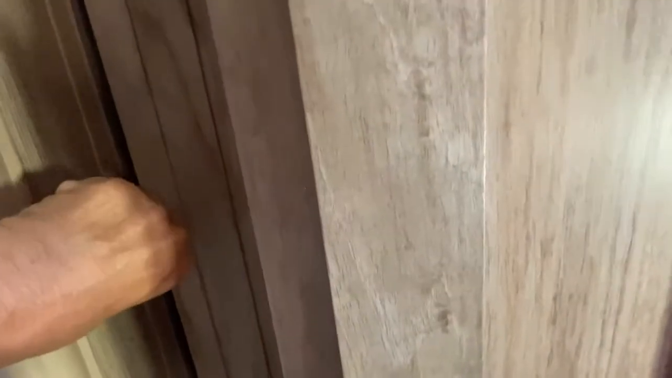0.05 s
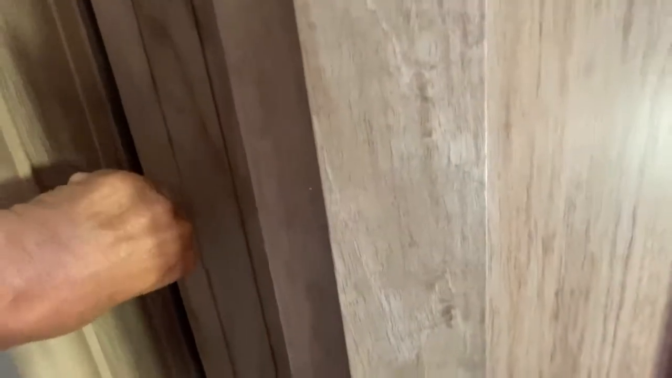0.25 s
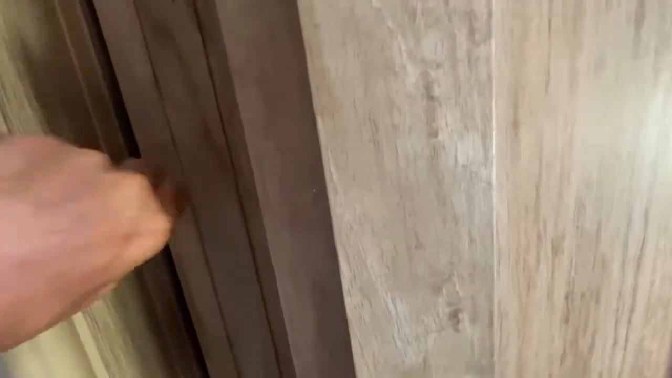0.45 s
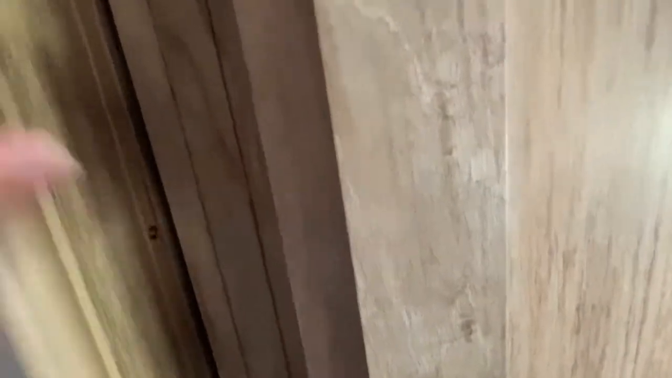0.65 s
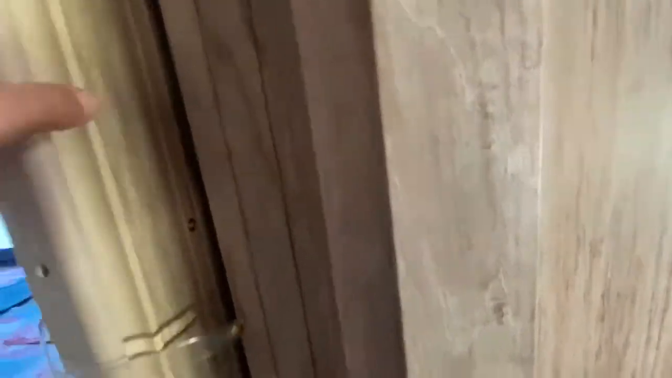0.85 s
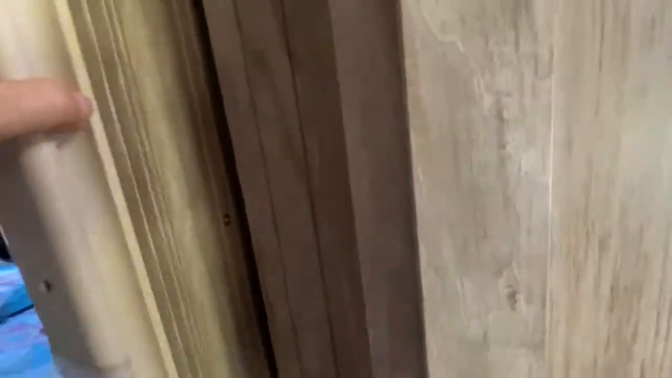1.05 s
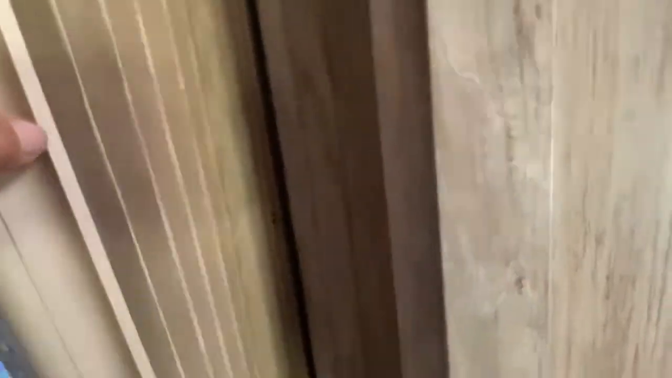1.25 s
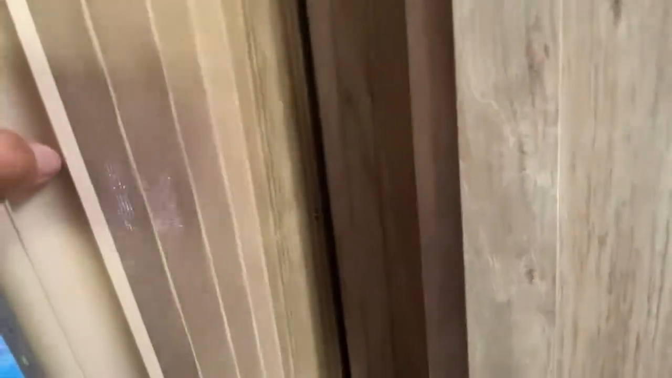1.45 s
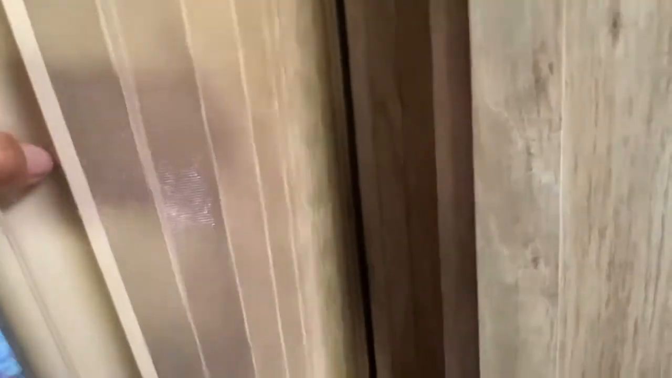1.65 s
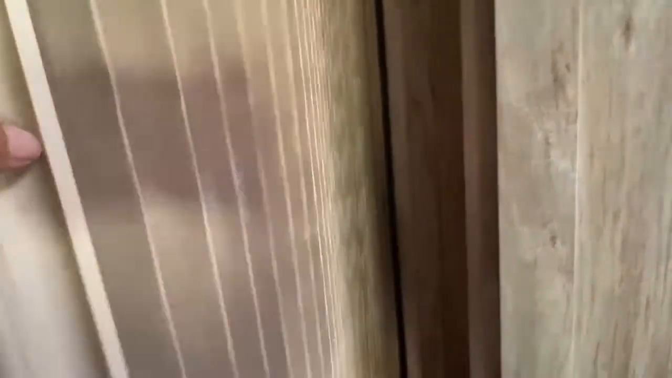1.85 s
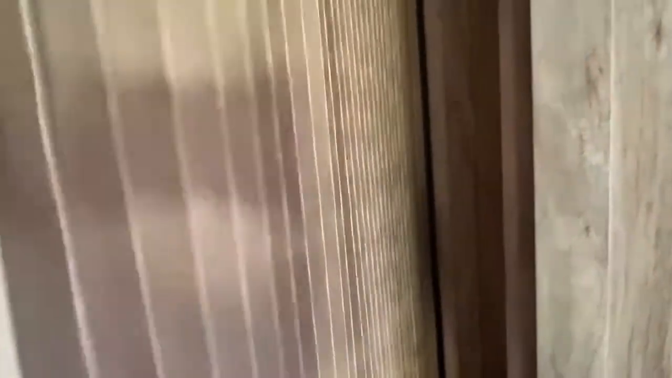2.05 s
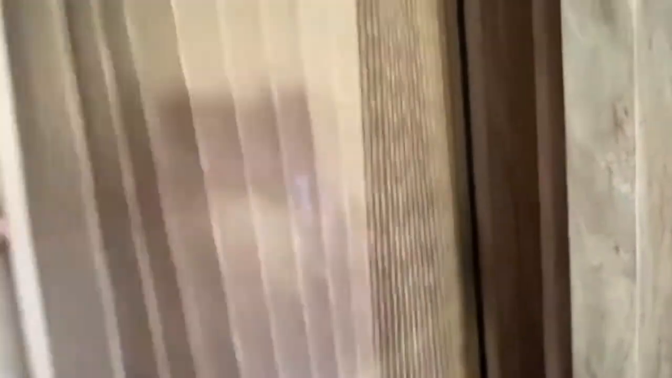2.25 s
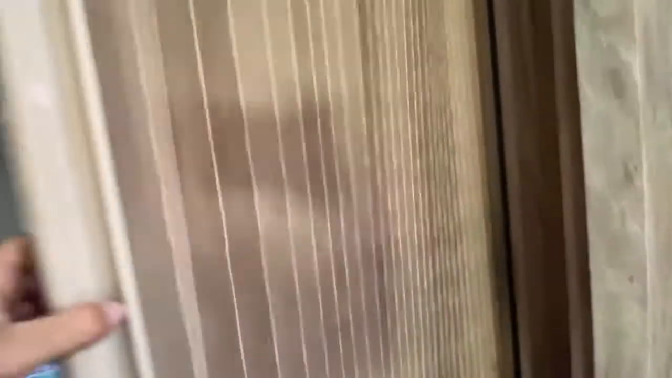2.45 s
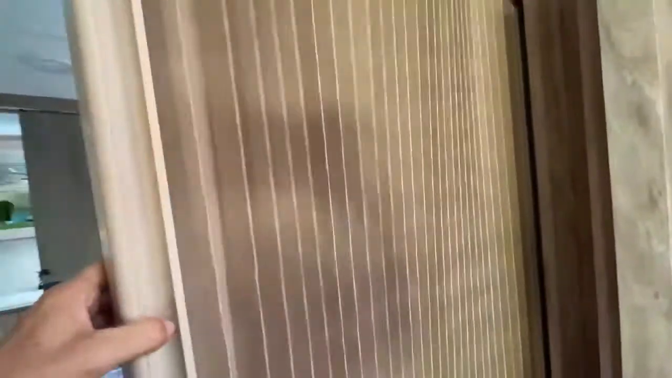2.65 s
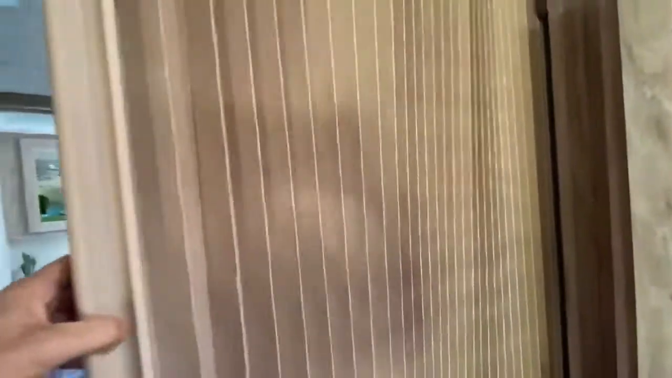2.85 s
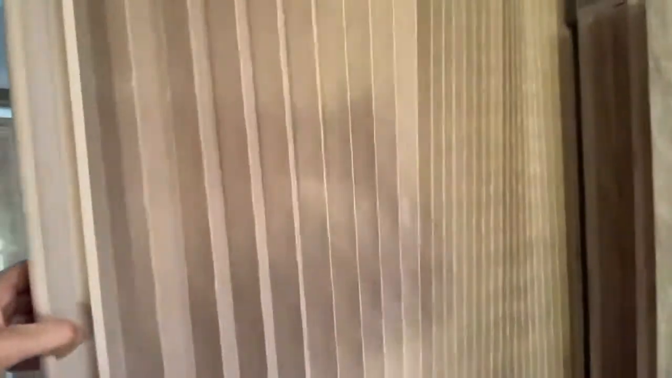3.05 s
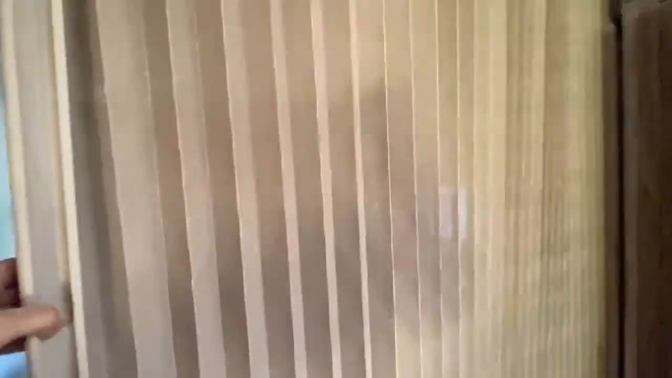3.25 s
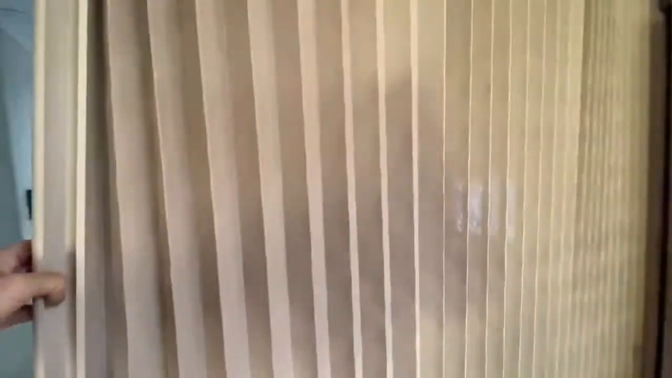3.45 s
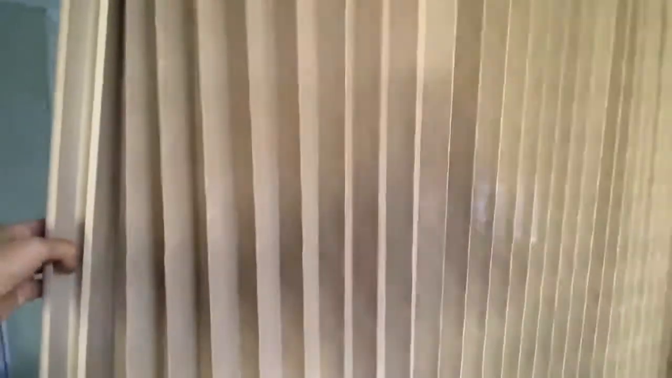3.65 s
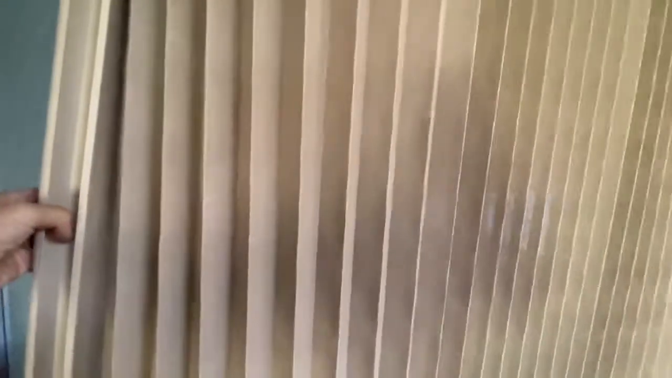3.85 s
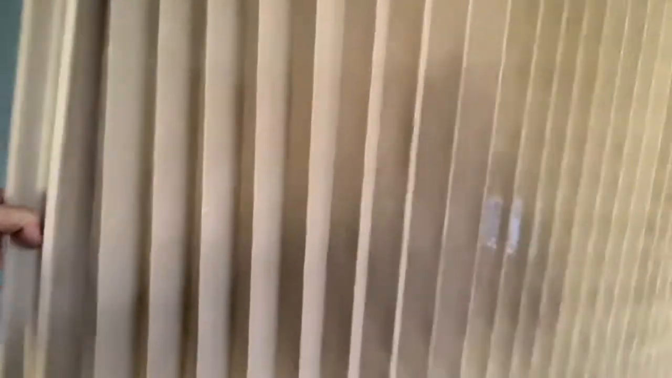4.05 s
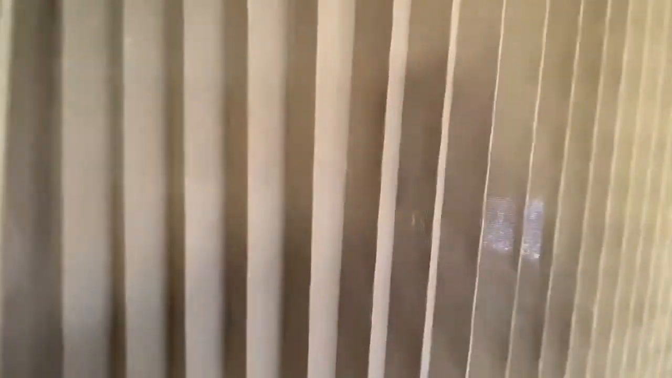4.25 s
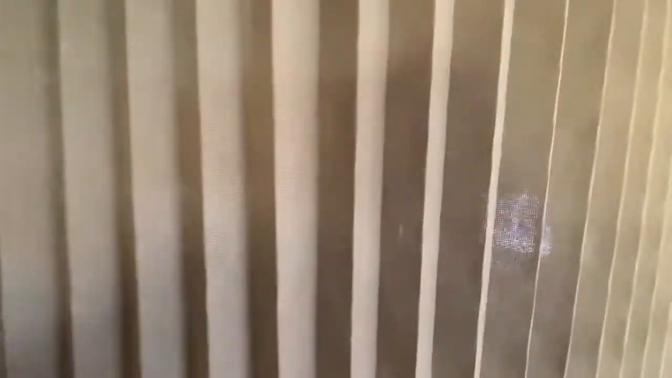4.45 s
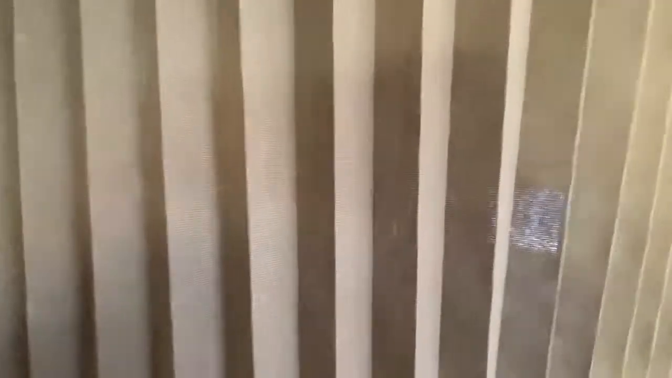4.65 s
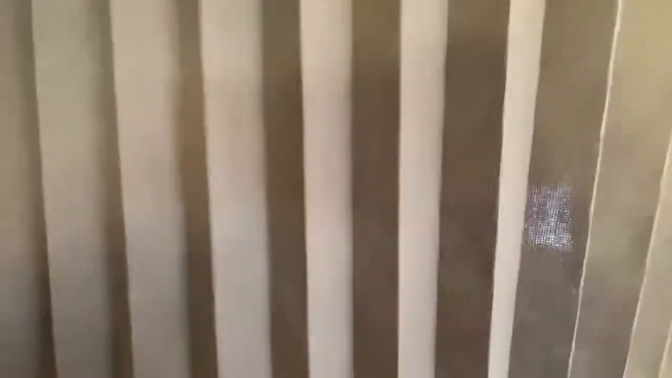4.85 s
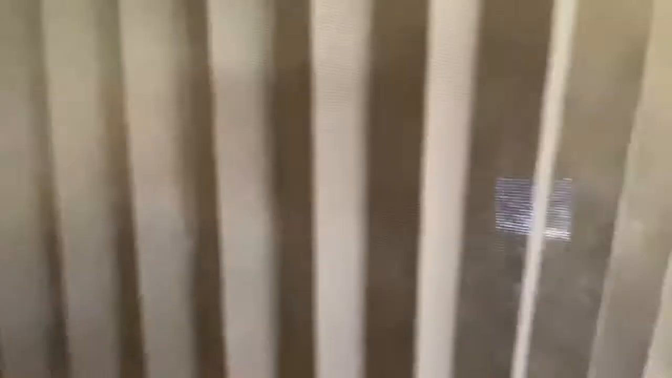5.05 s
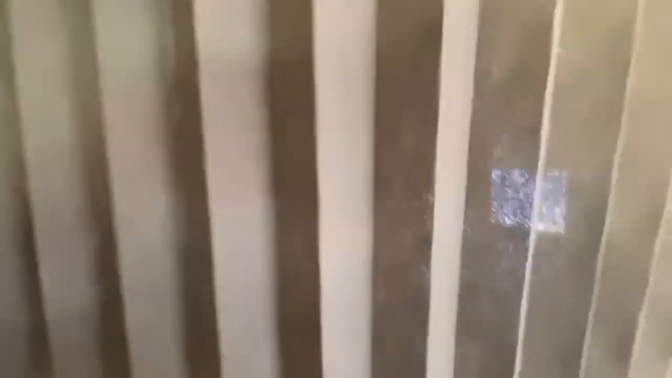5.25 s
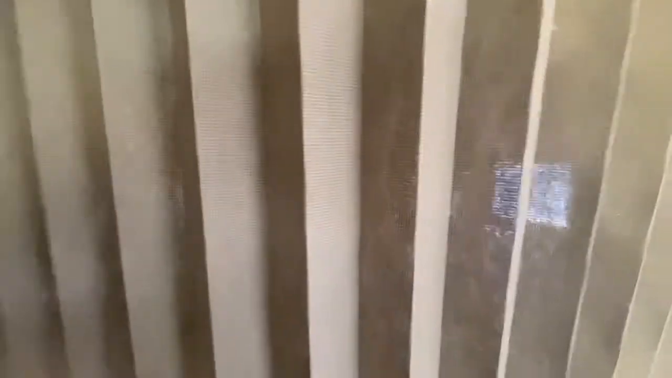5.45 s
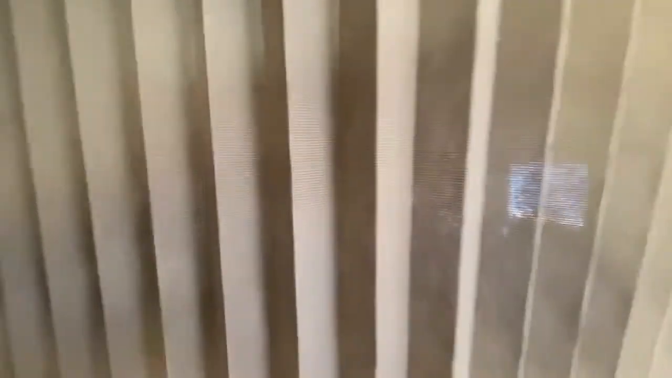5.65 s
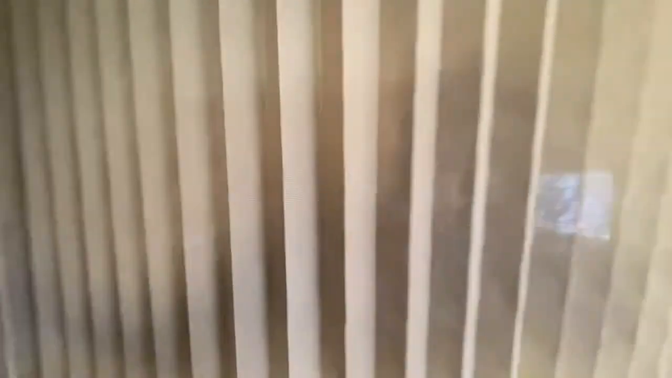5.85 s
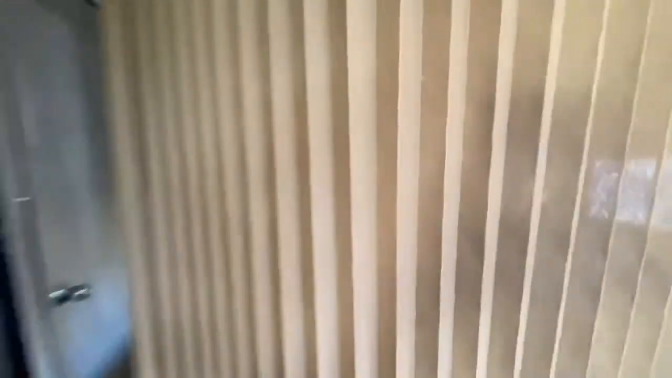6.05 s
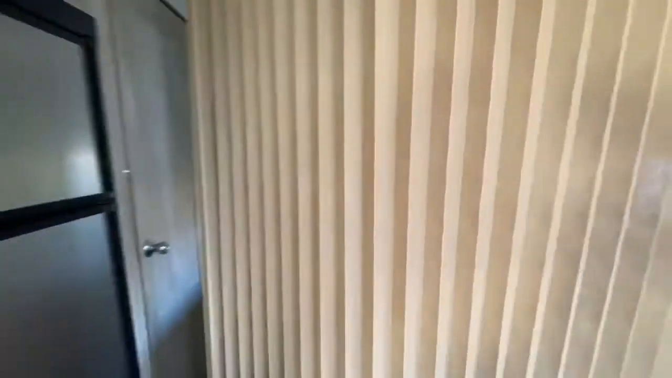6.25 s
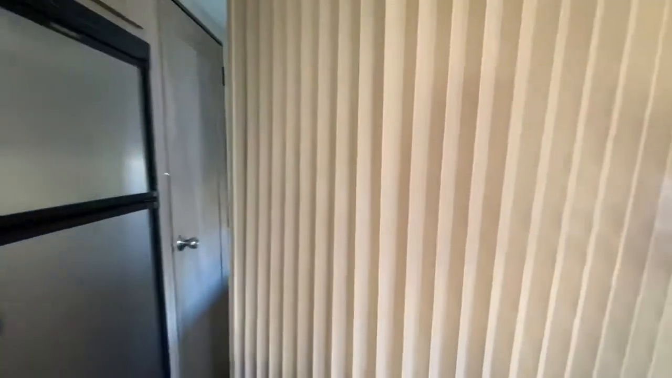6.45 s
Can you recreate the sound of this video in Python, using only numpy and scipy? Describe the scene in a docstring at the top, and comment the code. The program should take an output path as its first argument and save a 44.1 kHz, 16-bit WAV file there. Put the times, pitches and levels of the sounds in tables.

```python
"""A pleated folding door in a small camper: enveloped noise bands, decaying modes and friction grains. The
catch lets go with a jolt and a knock, and fingers tick off the handle. As the door is drawn, gliders scrape,
squeak and catch on the track. Pleats snap open one after another and rustle while the hanging panel sways and
bumps; the snaps ring on in the cabin. The last folds rub taut, and a faint breath follows."""
import sys
import numpy as np
from scipy import signal
from scipy.fft import rfft, irfft, next_fast_len
from scipy.io import wavfile
from scipy.ndimage import uniform_filter1d, map_coordinates

SR = 44100
rng = np.random.default_rng(int(sys.argv[2]) if len(sys.argv) > 2 else 0)


def master(y):
    """Save y as 16-bit WAV."""
    cut = np.clip(np.atleast_2d(y).T, -1, 1)
    pcm = np.round(cut * 32767)  # scale
    wavfile.write(sys.argv[1], SR, pcm.astype(np.int16))


N = 287091
TIME = np.arange(N) / SR
AGE = np.arange(2 * SR // 5) / SR  # time since a blow [s]
TOP_HZ = 15750  # upper band limit of the receiver

# Levels in the tables are relative: each source adds its own offsets.
# Quiet air of the cabin: (frequency [Hz], density [dB per Hz])
AIR_SPECTRUM = [(15, -30.5), (25, -5), (76, 8), (123, -6), (270, -13), (531, -16), (695, -16.5),
                (1160, -33), (1440, -28.5), (16000, -44.5)]
AIR_DB = -66.5
# How hard the door is moved: (time [s], effort [dB])
PULL_EFFORT = [(0.3, -76), (0.38, -83.5), (1.08, -64), (1.51, -53), (1.74, -49), (1.82, -62), (1.92, -51),
               (2.21, -56.5), (2.43, -63.5), (2.75, -62), (3.09, -58), (3.2, -60.5), (3.66, -56),
               (3.83, -59.5), (4.08, -74.5), (4.31, -65.5), (4.44, -60.5), (5.75, -58), (5.92, -62),
               (6.02, -76)]
STEADY_PULL_DB = -58
HALF_OPEN_S, SLACK_S = 3.33, 0.61  # when the panel hangs loosest, and for how long either side
# Panel set swinging by the latch or a tug: (time [s], length [s], level [dB])
SWINGS = [(0.45, 0.05, -49), (2.2, 0.54, -51.5), (3.193, 0.077, -38), (4.749, 0.37, -46)]
# Swaying panel, flexing folds, crinkling skin: (frequency [Hz], density [dB per Hz])
SWAY_SPECTRUM = [(20, -30), (48, 3.5), (96, -4), (115, -2), (172, -16.5), (237, -12), (270, -9.5),
                 (319, -13), (414, -13.5), (436, -29), (550, -23.5), (720, -23.5), (1210, -120)]
FLEX_SPECTRUM = [(260, 1), (450, -3.5), (661, -5.5), (810, 3.5), (1100, -1.5), (1300, 3.5), (2160, -15),
                 (2400, -5.5), (3120, -32), (5280, -120)]
RUSTLE_SPECTRUM = [(1180, -17.5), (2000, -2.5), (2510, -4.5), (4860, -6), (5440, -13), (6590, -9.5),
                   (7770, -21.5), (11500, -15), (12700, -29), (16000, -27.5)]
# Modes of the half-open hollow panel: (frequency [Hz], level [dB], 60 dB decay time [s])
HOLLOW_MODES = [(95.9, 0, 0.23), (168.7, -4.5, 0.35), (263.1, -4, 0.3), (328.6, 2.5, 0.11)]
# Modes of the whole panel swinging after a bump: (frequency [Hz], level [dB], 60 dB decay time [s])
THUMP_MODES = [(63, -12, 0.22), (89.4, 0, 0.2), (120.8, -4, 0.22)]
# Gliders dragging on the track: (time [s], length [s], level [dB], rasp over that level [dB])
DRAGS = [(1.324, 0.054, -47.5, -5.5), (1.389, 0.032, -45, -23), (1.473, 0.12, -51, -7.5),
         (1.591, 0.014, -40.5, -13), (1.64, 0.051, -44, -23), (4.241, 0.3, -69, -2)]
# Friction of the gliders on the track: (frequency [Hz], density [dB per Hz])
TRACK_SPECTRUM = [(320, -59), (550, -25.5), (851, -30), (1020, -0.5), (1130, -11.5), (1780, -15),
                  (1970, -32), (2240, -21.5), (2630, -26.5), (3300, -39), (5420, -48), (15400, -120)]
# Resonances of the track channel: (frequency [Hz], width [Hz], level [dB])
CHANNEL_PEAKS = [(867, 25, 1.5), (977, 31, 1), (1063, 24, -2.5), (1220, 14, 0.5), (1312, 16, -1),
                 (1414, 50, -8.5), (2500, 130, -28), (3240, 420, -14.5)]
# Main scrape resonance, shifting as the gliders tilt in the track: (time [s], frequency [Hz])
SCRAPE_PITCH = [(1.33, 1200), (1.385, 1560), (1.42, 1000), (1.53, 1350), (1.605, 1050), (1.635, 1320),
                (1.68, 1080), (4.25, 1220)]
# Last folds rubbing as they pull taut: (time [s], length [s], level [dB])
STRETCH = (5.639, 0.29, -53.5)
# Folds rubbing, skin brushing: (frequency [Hz], density [dB per Hz])
FOLD_SPECTRUM = [(200, 4.5), (380, 10.5), (550, 2), (850, 10), (1700, -15), (2600, -1.5), (4800, 2.5),
                 (6200, -13), (9000, -30), (16000, -51)]
SKIN_SPECTRUM = [(2000, 0.5), (5000, -5.5), (8000, -13.5), (11000, -2.5), (13500, -17.5), (16000, -16.5)]
# Fingers and palm sliding round the post: (time [s], length [s], level [dB])
HAND_RUBS = [(0.43, 0.12, -68), (0.758, 0.11, -60), (1.053, 0.099, -62), (4.007, 0.087, -59)]
# A faint breath as the door comes to rest: (time [s], length [s], level [dB])
FAINT_BREATH = (6.04, 0.19, -53.5)
# The faint breath: (frequency [Hz], density [dB per Hz])
BREATH_SPECTRUM = [(88, -55.5), (200, -20), (341, 0.5), (702, -10.5), (821, -3.5), (1240, -20),
                   (2100, -24.5), (3620, -28), (6640, -30), (16000, -59)]
# Gliders squeaking on the rail: (time [s], level [dB], length [s])
SQUEAKS = [(1.723, -43.5, 0.038), (1.9655, -29.5, 0.0097), (1.983, -41.5, 0.029), (1.988, -43, 0.016),
           (3.646, -48.5, 0.043)]
RAIL_HZ, RAIL_WIDTH_HZ = 4440, 920  # the resonance that a squeak rings
# One glider jumping free: (time [s], peak level [dB], frequency [Hz], half length [s])
GLIDER_PING = (1.9678, -14, 4400, .0006)
# Tiny dry ticks as the fingers leave the handle: (time [s], level [dB])
FINGER_TICKS = [(0.5786, -50), (0.5921, -44), (0.599, -42.5), (0.6114, -46.5), (0.6774, -49), (0.7233, -58)]
# Dry, glassy cracks at the peaks of the hardest snaps: (time [s], level [dB])
CRACKS = [(0.2078, -34.5), (2.0758, -38), (2.5295, -31), (3.0565, -29.5), (3.0638, -34.5), (3.0795, -38.5),
          (3.325, -35), (3.663, -41.5), (4.9208, -36.5), (5.316, -35.5)]
# Ticks and cracks: (frequency [Hz], density [dB per Hz])
CRACK_SPECTRUM = [(2000, -11.5), (5000, -8.5), (11500, 1.5), (13500, -23.5), (15000, -6), (16300, -14)]
# The catch and its plate: (frequency [Hz], density [dB per Hz])
CATCH_SPECTRUM = [(76, -29), (130, -14), (230, 8.5), (345, -6.5), (510, -2.5), (640, -1.5), (872, 1.5),
                  (1010, -16.5), (1770, -15), (2120, -29.5), (3120, -53), (5280, -67)]
# Modes of the door jamb: (frequency [Hz], level [dB], 60 dB decay time [s])
JAMB_MODES = [(100.5, -1.5, 0.39), (422, -1, 0.13), (740, 2, 0.09), (1325, -13.5, 0.22), (2060, -15, 0.2)]
# Leading post and panel bumping: (time [s], level [dB], weight [dB], pitch of the struck spot [Hz],
# its ring over the level [dB]); heavy bumps thump, light ones clack
KNOCKS = [(0.209, -28.5, 6.5, 750, -3), (0.332, -50.5, 4, 515, 0), (0.421, -41, 2.5, 275, 3),
          (0.764, -45, -25, 344, 7.5), (0.849, -43.5, -7, 341, 6), (0.977, -44.5, -4, 426, -0.5),
          (1.238, -39.5, -2, 447, -5), (1.286, -37.5, 6, 116, 6.5), (1.415, -42.5, -28, 1006, 11.5),
          (1.487, -44.5, 5.5, 221, 7.5), (1.636, -40, 12, 124, 11.5), (1.673, -33.5, 4, 849, -8),
          (1.783, -48.5, 2.5, 315, 8), (2.157, -43, 5.5, 825, -2.5), (2.441, -38.5, 4.5, 305, -5),
          (2.522, -28.5, 1.5, 331, -8), (2.732, -42.5, -24.5, 465, 0.5), (3.034, -44, -8.5, 266, 14),
          (3.055, -29, -5, 269.5, 7.5), (3.074, -24, 1, 115, 4), (3.186, -37, 6, 311, 7.5),
          (3.219, -29, -0.5, 340.6, 9.5), (3.466, -36, 2.5, 348, -2.5), (3.577, -40.5, 6, 290, 5.5),
          (3.66, -44, 12.5, 227, 10.5), (4.025, -37.5, 7, 90, 4.5), (4.341, -45.5, -15, 352, 3),
          (4.397, -54, 13, 116, 11.5), (4.521, -43, -12, 1260, 2), (4.857, -42.5, 0, 284, 6.5),
          (5.295, -38.5, 9, 826, -0.5), (5.315, -32.5, 0, 245, 3), (5.813, -49.5, 7.5, 339, 6),
          (6.465, -66.5, -18, 797, 8.5)]
# The struck post: (frequency [Hz], density [dB per Hz])
POST_SPECTRUM = [(96, 1), (139, 1), (190, 3), (246, 3), (286, -1.5), (338, -3), (451, -6), (494, -14.5),
                 (648, -32), (732, -25), (904, -30), (975, -35), (1300, -38.5), (1690, -52), (2860, -120)]
# Pleats snapping open: (time [s], level [dB], brightness [dB], the pleat's own pitch [Hz])
PLEAT_SNAPS = [(0.2066, -32.5, 5, 1770), (0.2419, -38, -3.5, 1310), (0.421, -47.5, -13, 1230),
               (0.472, -52.5, -8, 2360), (0.7622, -45, -1, 1060), (0.848, -44, -1.5, 2290),
               (1.1267, -37.5, -4, 975), (1.191, -48, -1, 1620), (1.293, -34, -3, 1298),
               (1.3581, -31, 2.5, 1400), (1.729, -33.5, -3, 4320), (1.864, -39, 3.5, 1230),
               (2.0689, -28.5, 2.5, 4670), (2.073, -37.5, 10.5, 3900), (2.2, -39, 2, 1480),
               (2.22, -41.5, -2.5, 1500), (2.263, -43, -0.5, 4500), (2.316, -36, 4.5, 2310),
               (2.3397, -33, 6.5, 4550), (2.384, -39, 7.5, 5230), (2.426, -42, 0, 4790),
               (2.4484, -33.5, -1.5, 3920), (2.517, -32.5, -0.5, 1190), (2.528, -31.5, 0, 1070),
               (2.632, -38.5, 1, 4360), (2.7337, -30.5, 2.5, 2420), (2.846, -41.5, -3, 2550),
               (2.991, -46, 3.5, 2750), (3.012, -34, 4, 6780), (3.054, -29, 0.5, 890),
               (3.062, -26, 1, 1420), (3.0755, -28, 1, 765), (3.1981, -27.5, 0, 5000),
               (3.258, -38.5, 6, 1146), (3.3234, -33, 7, 5200), (3.413, -39, 3, 4830),
               (3.456, -34.5, 0, 4800), (3.5847, -30.5, -1, 4560), (3.6124, -35, 1, 3100),
               (3.6603, -27.5, 7, 4970), (3.757, -41, 4, 2930), (3.777, -44, 1.5, 5030),
               (3.829, -48, 5, 4700), (4.338, -46, 0.5, 1290), (4.368, -50, 6, 1290),
               (4.4842, -37.5, -3, 1210), (4.5192, -37.5, -3, 2690), (4.687, -47.5, 6, 4800),
               (4.807, -36, 3, 4470), (4.886, -36.5, -3, 2600), (4.92, -28.5, 5.5, 5120),
               (5.173, -46.5, 7.5, 1380), (5.243, -44, 6.5, 2570), (5.2841, -36.5, 1, 2800),
               (5.291, -32.5, -0.5, 3450), (5.3133, -33, -0.5, 3750), (5.459, -35.5, 7.5, 2500),
               (5.639, -40, 3.5, 2920), (5.869, -44, -3, 2460)]
# A snapping pleat: (frequency [Hz], density [dB per Hz])
PLEAT_SPECTRUM = [(410, -22), (750, -12.5), (1210, -3), (2000, -10.5), (2490, -6.5), (3940, -6),
                  (4920, -1.5), (5400, -10.5), (6570, -8), (7790, -24.5), (11100, -17.5), (13300, -34.5),
                  (16000, -28)]
# Two microphone ports: (frequency [Hz], likeness [0-1], phase of left [rad], left over right [dB])
PORT_FIELD = [(96.3, 0.96, 0.48, -2.5), (306, 0.99, 0.79, -7.5), (455, 0.86, 0.5, -7.5),
              (606, 0.42, 2.53, -1.5), (1210, 0.43, 1.9, 1), (1560, 0, 3.97, -3), (2364, 0.5, 6.3, -3.5),
              (3130, 0, 5.97, 0), (4460, 0.1, 5.13, 1.5), (7600, 0.2, 6.1, 5), (10700, 0.3, 17, -3),
              (12260, 0.5, 7.7, 2.5), (14350, 0.6, 4, -0.5)]
# Narrow peaks and dips given to every sound: (frequency [Hz], width [Hz], level [dB])
COLOUR_PEAKS = [(289, 23, -0.5), (670, 36, -2), (742, 34, 3.5), (5800, 170, 5), (6050, 420, -8),
                (7100, 500, 0), (7680, 220, -2.5)]


def amp(db):
    """Amplitude ratio of a level in dB."""
    return 10 ** (np.asarray(db) / 20)


def unit(x):
    """Normalisation to an rms of 1."""
    return x / np.sqrt(np.mean(x ** 2) + 1e-20)


def fade(t60):
    """Exponential damping: a fall of 60 dB in t60 seconds."""
    return np.exp(-np.log(1000) * AGE / t60)


def rise(seconds):
    """Finite contact time: a blow starts softly."""
    return 1 - np.exp(-AGE / max(seconds, 1 / SR))


def along(points, hz):
    """Interpolation of (frequency, value) points on a logarithmic axis."""
    f, v = np.transpose(points)
    return np.interp(np.log(hz + 1), np.log(f + 1), v)


def filtered(x, response):
    """Linear filtering: the spectrum of x times a response of frequency."""
    size = x.shape[-1]
    padded = next_fast_len(size + SR // 20, True)
    hz = np.fft.rfftfreq(padded, 1 / SR)
    return irfft(rfft(x, padded) * response(hz), padded)[..., :size]


def coloured(x, spectrum, ripple_db=2, spacing_hz=110):
    """Modal density: a given spectrum rippled by many close resonances, at rms 1."""
    knots = rng.standard_normal(2048)

    def response(hz):
        ripple = np.interp(hz / spacing_hz, np.arange(len(knots)), knots)
        depth_db = ripple_db * np.minimum(hz / 1000, 1)  # less ripple below 1 kHz
        return amp(along(spectrum, hz) + depth_db * ripple)
    return unit(filtered(x, response))


def band(x, lo, hi):
    """Band-pass filtering with sloping edges, at rms 1."""
    def response(hz):
        low_edge = 1 + (lo / (hz + 1)) ** 14
        high_edge = 1 + (hz / hi) ** 14
        return 1 / np.sqrt(low_edge * high_edge)
    return unit(filtered(x, response))


def bandpass(hz, centre, width):
    """Complex response of one damped resonator, 1 at its centre."""
    return 1j * hz * width / (centre * centre - hz * hz + 1j * hz * width)


def resonant(x, peaks):
    """Resonators in parallel excited by x, at rms 1."""
    return unit(filtered(x, lambda hz: sum(amp(db) * bandpass(hz, c, w) for c, w, db in peaks)))


def ringing(modes, size=1):
    """Modal decay, each mode at its own phase; a larger part rings lower."""
    out = 0
    for hz, db, t60 in modes:
        cycles = hz / size * AGE + rng.random((2, 1))
        out = out + amp(db) * fade(t60) * np.sin(2 * np.pi * cycles)
    return out


def noise(size=N):
    """Two uncorrelated white noises: one for the shared field, one for the diffuse field."""
    return rng.standard_normal((2, size))


def wobble(rate):
    """Slow random modulation: a smooth curve with rate knots a second."""
    return map_coordinates(rng.standard_normal(int(TIME[-1] * rate) + 4), [TIME * rate])


def steady(x):
    """Levelling the slow beats of close modes, so that a blow starts at its full strength."""
    return x / np.sqrt(np.abs(uniform_filter1d(x ** 2, size=SR // 40)) + 1e-9)


def grains(spectrum, rate, spread_db, t60, smooth):
    """Stick-slip friction: random uneven slips, each ringing briefly, over smooth rubbing."""
    sizes = amp(spread_db * np.minimum(rng.exponential(size=N), 4))
    slips = (rng.random(N) < rate / SR) * sizes  # rate is slips a second
    power = np.abs(signal.fftconvolve(slips ** 2, fade(t60) ** 2)[:N])
    return coloured(noise() * np.sqrt(power / power.mean() + smooth), spectrum)


def stroke(s, length, db, attack, release):
    """Envelope of one rub: it swells, holds and dies away."""
    swell = 1 - np.exp(-np.maximum(TIME - s, 0) / attack)
    return amp(db) * swell * np.exp(-np.maximum(TIME - s - length, 0) / release)


def shifting(pitch, width_hz):
    """Narrow-band noise on a moving carrier: a rubbed resonance follows a pitch curve, at rms 1."""
    phase = 2 * np.pi * np.cumsum(np.interp(TIME, *np.transpose(pitch))) / SR
    pair = [wobble(width_hz) * np.cos(phase) + wobble(width_hz) * np.sin(phase) for _ in range(2)]
    return unit(np.array(pair))


def effort(s):
    """Driving force at time s, in dB over a steady pull."""
    return np.interp(s, *np.transpose(PULL_EFFORT)) - STEADY_PULL_DB


def slack(s):
    """Freedom of the panel, 0-1: it swings and rings most freely when half open."""
    return 1 / np.hypot(1, (s - HALF_OPEN_S) / SLACK_S)


def add(out, s, sound):
    """Superposition: mix a sound in at time s."""
    start = int(np.clip(round(s * SR), 0, N - 1))
    out[:, start:start + sound.shape[-1]] += sound[..., :N - start]


def cabin():
    """Stationary background noise: the quiet air of the cabin."""
    return amp(AIR_DB) * coloured(noise(), AIR_SPECTRUM)


def panel(sway_db=-57, slack_db=10, drum_db=-6, flex_db=-61, rustle_db=-64,
          sway_grows=0.59, flex_grows=0.92, rustle_grows=0.73, stop_s=0.28, settle_s=0.083):
    """Forced vibration: the pull sways and drums the panel, flexes folds, crinkles skin; tugs swing it."""
    pull = effort(TIME)  # each part grows by its own share of these dB
    start, end = PULL_EFFORT[0][0], PULL_EFFORT[-1][0]
    moving = stroke(start, end - start, 0, attack=0.015, release=stop_s)
    swings = sum(stroke(*row, attack=0.0095, release=settle_s) for row in SWINGS)
    pulled = moving * amp(sway_db + sway_grows * pull + slack_db * slack(TIME) ** 2)
    sway = grains(SWAY_SPECTRUM, rate=49, spread_db=1.5, t60=0.19, smooth=0.51)
    drum = unit(signal.fftconvolve(noise(), ringing(HOLLOW_MODES), axes=1)[:, :N])
    low = np.hypot(pulled, swings) * (sway + amp(drum_db) * slack(TIME) * drum)
    flexing = grains(FLEX_SPECTRUM, rate=95, spread_db=1.0, t60=0.08, smooth=0.1)
    folds = amp(flex_db + flex_grows * pull) * flexing
    rustling = grains(RUSTLE_SPECTRUM, rate=150, spread_db=3.0, t60=0.19, smooth=0.093)
    skin = amp(rustle_db + rustle_grows * pull) * rustling
    return low + moving * (folds + skin)


def hand_on_post(hand_db=-1):
    """Skin friction: fingers and palm brush round the post in many fine slips."""
    rubs = sum(stroke(*row, attack=0.015, release=0.032) for row in HAND_RUBS)
    return amp(hand_db) * rubs * grains(SKIN_SPECTRUM, rate=2500, spread_db=4.5, t60=0.0068, smooth=0.41)


def folds_stretching():
    """Friction between surfaces: the last folds rub as they pull taut."""
    fibres = grains(FOLD_SPECTRUM, rate=600, spread_db=3, t60=0.025, smooth=0.2)
    return stroke(*STRETCH, attack=0.0037, release=0.046) * fibres


def faint_breath():
    """Evenly coloured noise: a faint soft breath follows as the door comes to rest."""
    return stroke(*FAINT_BREATH, attack=0.028, release=0.046) * coloured(noise(), BREATH_SPECTRUM)


def gliders_on_track(grate_db=-7.5, ring_db=-5.5, shift_db=-6.0, judder_db=1.5,
                     handover_rate=2.18, grip_s=0.0052, let_go_s=0.027):
    """Stick-slip excitation of a resonator: gliders grate and rasp along the track and ring it."""
    grate = sum(stroke(s, length, db, grip_s, let_go_s) for s, length, db, _ in DRAGS)
    rasp = sum(stroke(s, length, db + over, grip_s, let_go_s) for s, length, db, over in DRAGS)
    # the weight passes between two gliders, each with its own resonances
    load = 2 * np.pi * handover_rate * TIME
    first, second = (grains(TRACK_SPECTRUM, rate=350, spread_db=3.5, t60=0.02, smooth=0.15)
                     for _ in range(2))
    scrape = np.cos(load) * first + np.sin(load) * second
    grating = amp(grate_db) * band(scrape, 400, 3400)
    grating = grating + amp(ring_db) * band(resonant(noise(), CHANNEL_PEAKS), 570, 3800)
    grating = grating + amp(shift_db) * shifting(SCRAPE_PITCH, width_hz=170)
    judder = unit(amp(judder_db * wobble(110)))  # stick and slip
    return judder * (grate * grating + rasp * band(scrape, 3140, 5400))


def squeaks(tail_db=-18, tail_t60=0.41):
    """Friction-driven resonance: sticking gliders chatter into the rail's resonance."""
    out = np.zeros((2, N))
    rail = [(RAIL_HZ, RAIL_WIDTH_HZ, 0)]
    for s, db, length in SQUEAKS:
        chatter = resonant(resonant(noise(len(AGE)), rail), rail)  # twice, for steeper skirts
        held = np.exp(-(AGE / length) ** 4)
        add(out, s, amp(db) * chatter * rise(0.0012) * (held + amp(tail_db) * fade(tail_t60)))
    return out


def ping():
    """Sudden release: one glider jumps free in a few sharp cycles, in the shared field only."""
    s, db, hz, width = GLIDER_PING
    since = TIME - s
    burst = np.exp(-0.5 * (since / width) ** 2) * np.sin(2 * np.pi * hz * since)
    return amp(db) * np.array([burst, np.zeros(N)])


def ticks_and_cracks(tick_db=-8, tick_t60=0.022, crack_db=-2, crack_t60=0.011):
    """Impulsive excitation with heavy damping: faint finger ticks and hard cracks, close and dry."""
    out = np.zeros((2, N))
    for rows, level_db, t60 in ((FINGER_TICKS, tick_db, tick_t60), (CRACKS, crack_db, crack_t60)):
        for s, db in rows:
            add(out, s, amp(db + level_db) * coloured(noise(len(AGE)), CRACK_SPECTRUM) * fade(t60))
    return out


def latch(s=0.2085, jamb_db=-33, catch_db=-31.5, hold_s=0.028, plate_db=-6, plate_t60=0.3):
    """Release of a stressed contact: the catch scrapes free in a jolt; its plate and the jamb ring on."""
    out = np.zeros((2, N))
    jolt = np.exp(-(AGE / hold_s) ** 4) + amp(plate_db) * fade(plate_t60)
    scrape = steady(coloured(noise(len(AGE)), CATCH_SPECTRUM))
    add(out, s, amp(catch_db) * scrape * rise(0.00054) * jolt)
    add(out, s, amp(jamb_db) * rise(0.00059) * ringing(JAMB_MODES))
    return out


def knocks(spot_db=-3, spot_t60=0.12, spot_rise=0.00089, knock_db=-12.5, knock_t60=0.4,
           clack_db=-8, clack_t60=0.16, clack_loss=0.24, muffle_db=4, rise_s=0.0003,
           hollow_db=-9, hollow_rise=0.0026, swing_rise=0.0064):
    """Impact on coupled bodies: post and struck spot sound at once; the hollow panel follows, thumping."""
    out = np.zeros((2, N))
    for s, db, weight, hz, ring in KNOCKS:
        modes = coloured(noise(len(AGE)), POST_SPECTRUM, ripple_db=6, spacing_hz=70)
        thump = ringing(THUMP_MODES, size=np.exp(rng.normal(0, 0.06))) * rise(swing_rise) ** 2
        knock = steady(band(modes, 160, 430)) * rise(rise_s) * fade(knock_t60)
        clack = steady(band(modes, 602, 1000)) * rise(rise_s) * fade(clack_t60)
        spot = rise(spot_rise) * ringing([(hz, ring, spot_t60)])
        hollow = slack(s) * ringing(HOLLOW_MODES) * rise(hollow_rise)
        # heavy bumps and a loose panel clack less
        clack_level = db - clack_loss * weight - muffle_db * slack(s) + clack_db
        add(out, s, amp(db + weight) * thump)
        add(out, s, amp(db + knock_db) * knock)
        add(out, s, amp(clack_level) * clack)
        add(out, s, amp(db + spot_db) * spot)
        add(out, s, amp(db + hollow_db) * hollow)
    return out


def rattle(level_db=-59, start=1.85, length=1.796):
    """Random impacts in clusters: lesser pleats and loose gliders tick, more strongly with the pull."""
    ticking = grains(PLEAT_SPECTRUM, rate=160, spread_db=3, t60=0.06, smooth=0)
    clustered = unit(ticking * amp(3 * wobble(22)))
    gain = stroke(start, length, level_db, attack=0.02, release=0.084)
    return gain * amp(effort(TIME) / 2) * clustered


def pleat_snaps(own_db=-13, own_width_hz=260, own_t60=0.11, body_db=-13.0, body_t60=0.11,
                snap_db=-11, snap_t60=0.073, tip_db=-28, tip_t60=0.14, tip_grows=0.84, firm_db=-30,
                cabin_db=-13, cabin_t60=0.3, crackle_db=3.0, rise_s=0.0022):
    """Snap-through buckling: a crackle at the pleat's pitch, harder being brighter; the cabin rings on."""
    out = np.zeros((2, N))
    for s, db, bright, hz in PLEAT_SNAPS:
        modes = coloured(noise(len(AGE)), PLEAT_SPECTRUM, ripple_db=5, spacing_hz=180)
        own = resonant(modes, [(hz, own_width_hz, 0)])
        flicker = unit(uniform_filter1d(rng.standard_normal(len(AGE)), size=40))
        crackle = unit(amp(crackle_db * flicker))
        tail = amp(cabin_db) * fade(cabin_t60)

        def shape(t60):
            return rise(rise_s) * np.hypot(crackle * fade(t60), tail)
        tip = db + bright + tip_grows * (db - firm_db)  # firm snaps gain the most top
        add(out, s, amp(db + own_db) * own * rise(rise_s) * crackle * fade(own_t60))
        add(out, s, amp(db - bright + body_db) * band(modes, 730, 2416) * shape(body_t60))
        add(out, s, amp(db + bright + snap_db) * band(modes, 2090, 9000) * shape(snap_t60))
        add(out, s, amp(tip + tip_db) * band(modes, 6450, TOP_HZ) * shape(tip_t60))
    return out


def ports(pair):
    """Spatial coherence: shared and diffuse fields reach two spaced ports in unlike phase and level."""
    def response(hz, sign):
        alike, phase, tilt_db = (along([(row[0], row[k]) for row in PORT_FIELD], hz) for k in (1, 2, 3))
        alike = np.clip(alike, 0, 0.97)
        shares = np.sqrt([1 + alike, 1 - alike] / (1 + alike * np.cos(phase)))
        shares = shares * [[1], [sign]]  # the diffuse part is opposite at the two ports
        return shares * np.exp(sign * 1j * phase / 2) * amp(sign * tilt_db / 2)
    left, right = (filtered(pair, lambda hz: response(hz, sign)).sum(axis=0) for sign in (1, -1))
    return np.array([left, right])


def scene():
    """Superposition of the cabin and every part of the door, heard at the two ports."""
    friction = hand_on_post() + folds_stretching() + faint_breath() + gliders_on_track() + squeaks()
    blows = ping() + ticks_and_cracks() + latch() + knocks() + rattle() + pleat_snaps()
    return ports(cabin() + panel() + friction + blows)


def record(dry):
    """Linear transmission: cabin and receiver colour all alike; nothing passes above the band limit."""
    def response(hz):
        peaks = [1 + (amp(db) - 1) * bandpass(hz, c, w) for c, w, db in COLOUR_PEAKS]
        return np.prod(peaks, axis=0) * (hz < TOP_HZ)
    return filtered(dry, response)


dry = scene()
out = record(dry)
master(out)
```